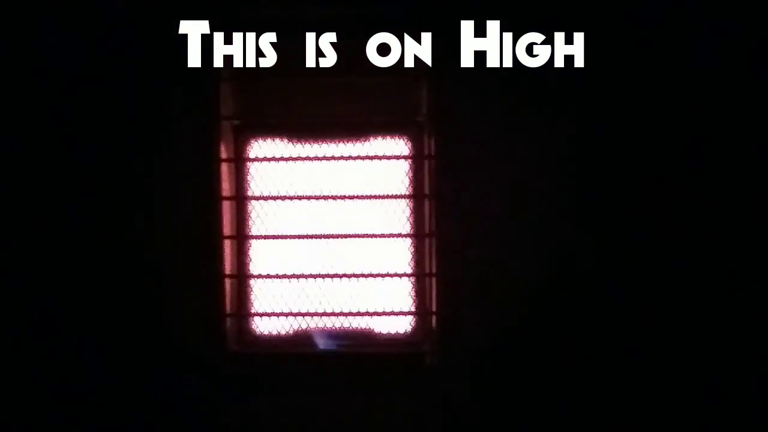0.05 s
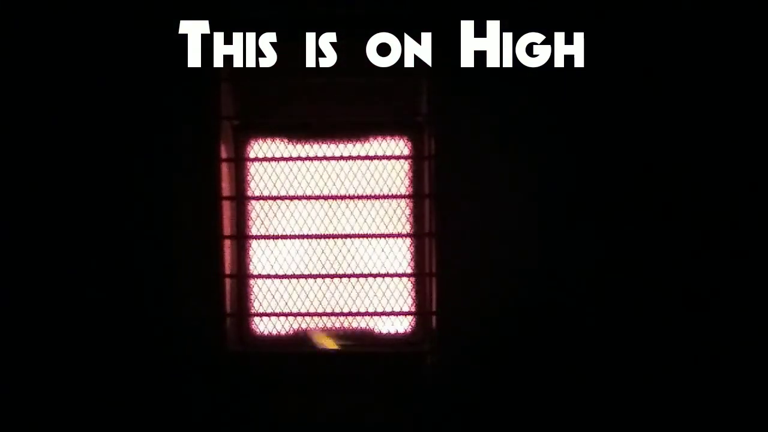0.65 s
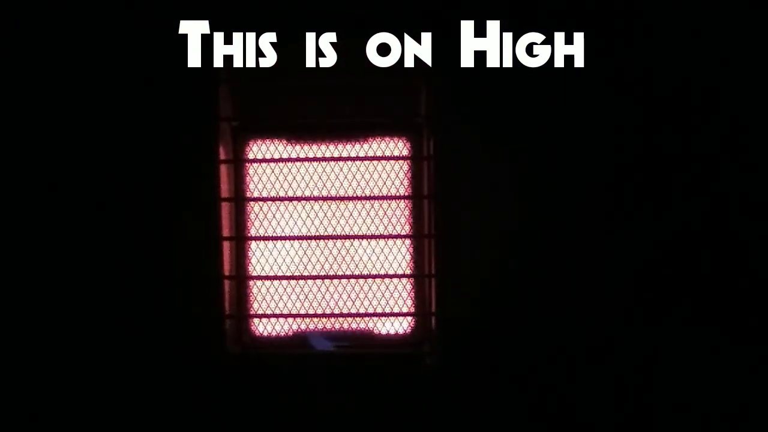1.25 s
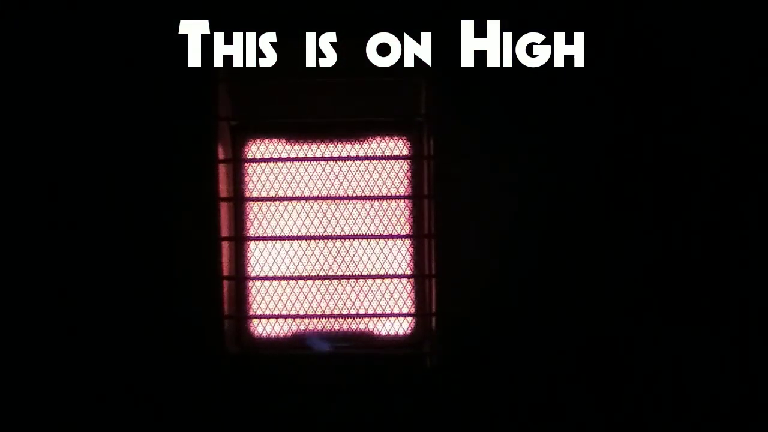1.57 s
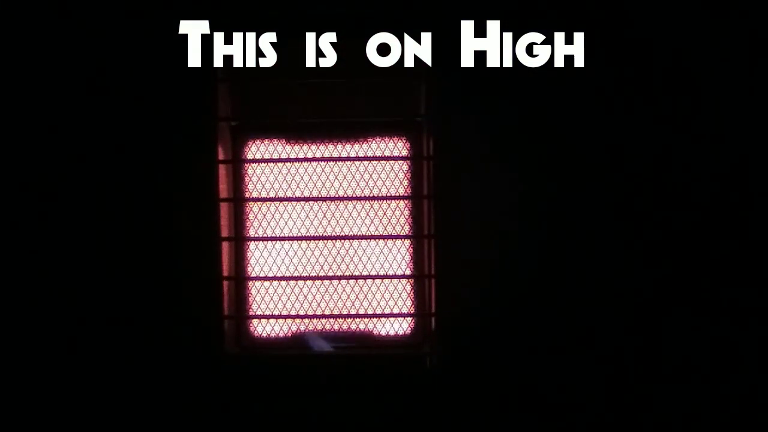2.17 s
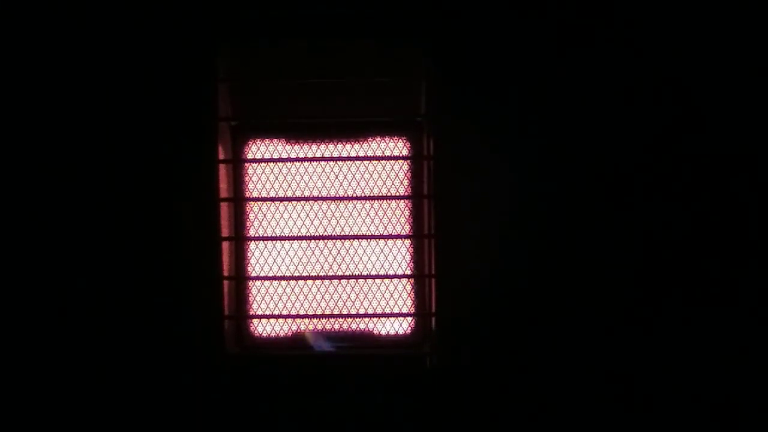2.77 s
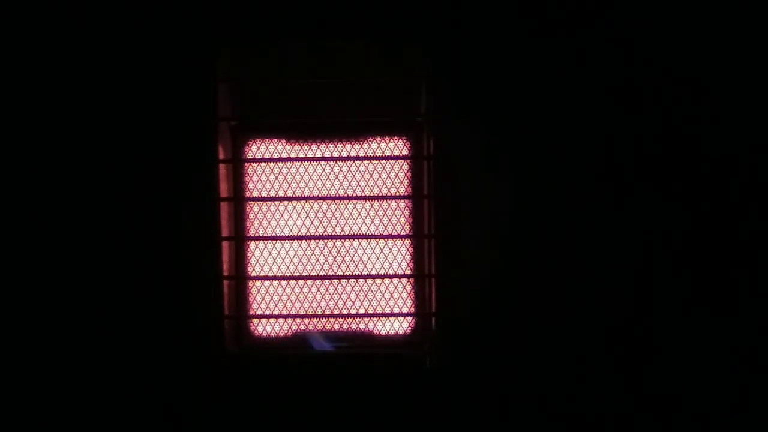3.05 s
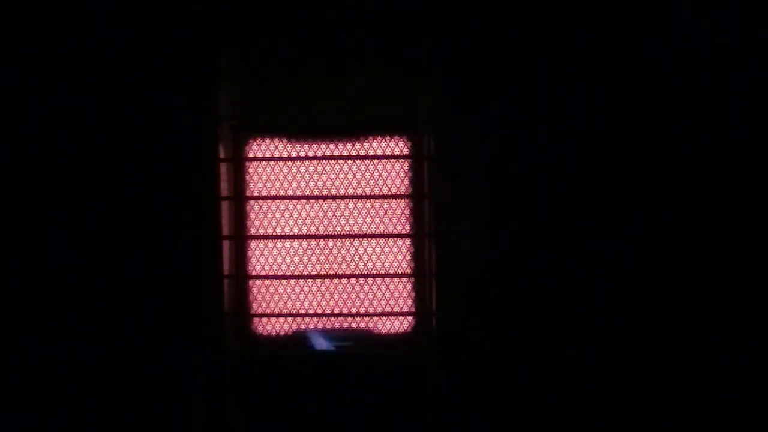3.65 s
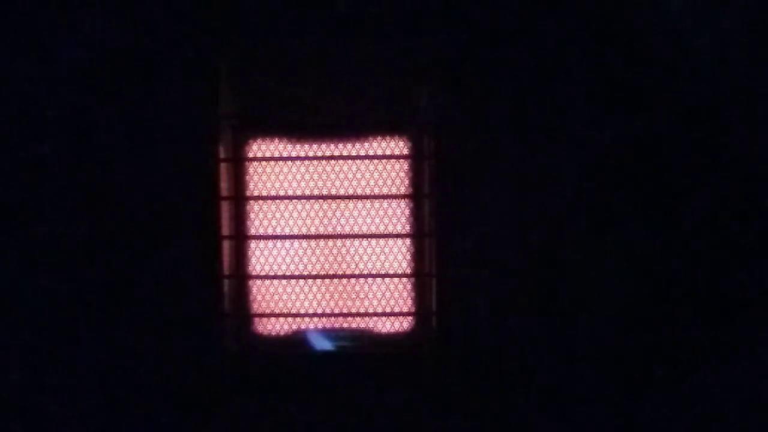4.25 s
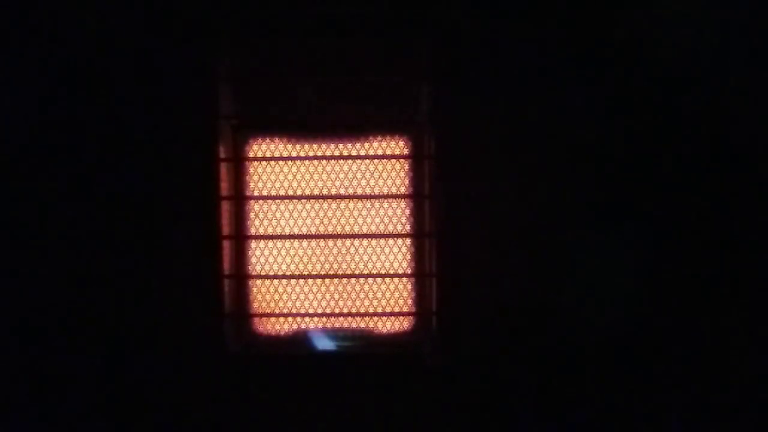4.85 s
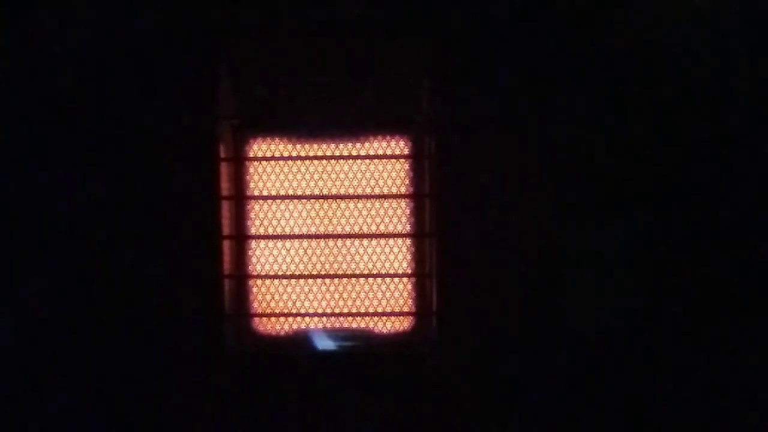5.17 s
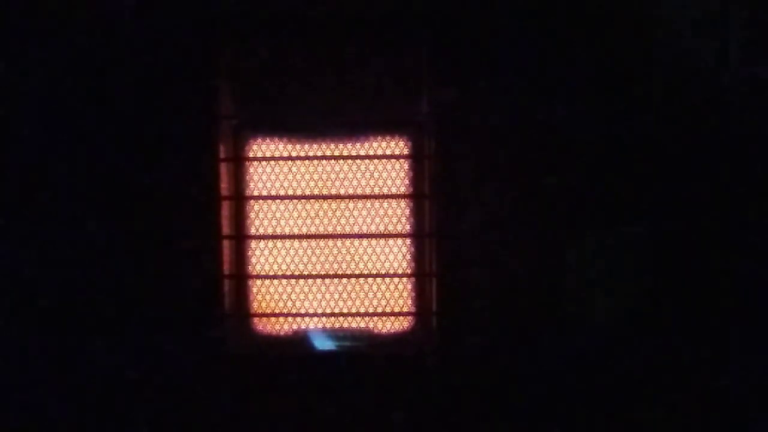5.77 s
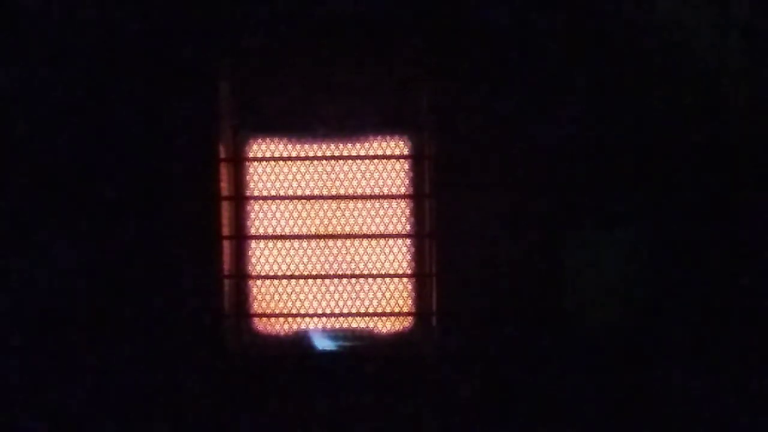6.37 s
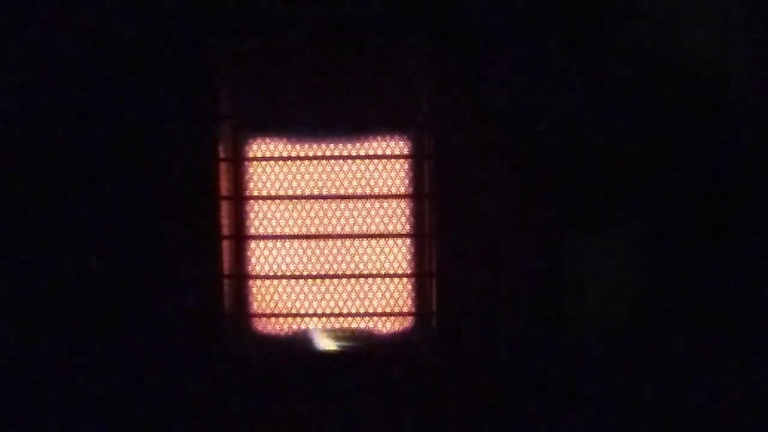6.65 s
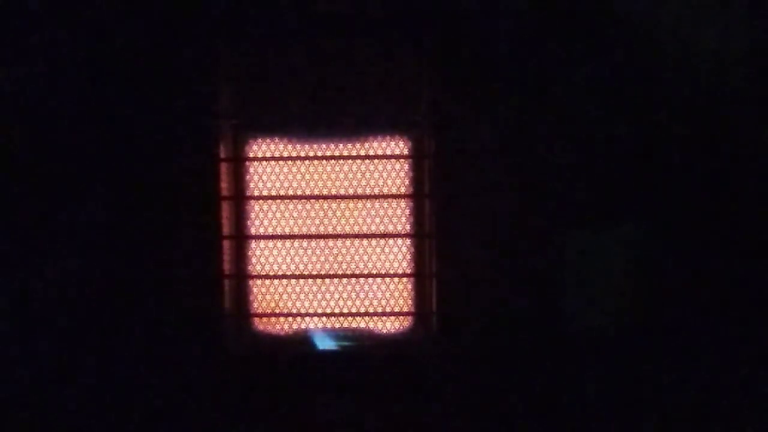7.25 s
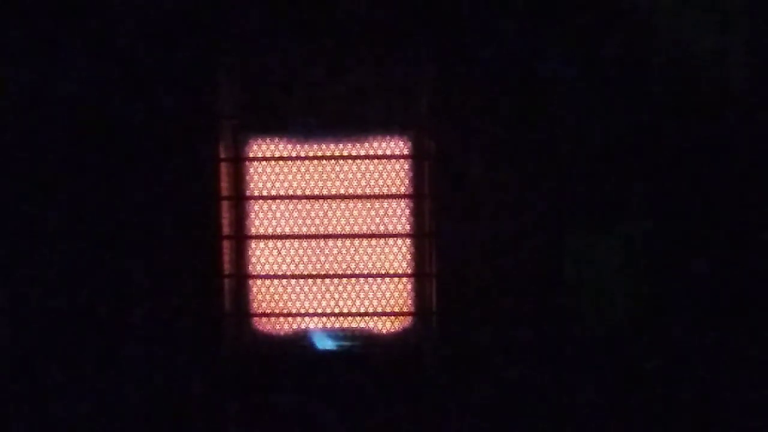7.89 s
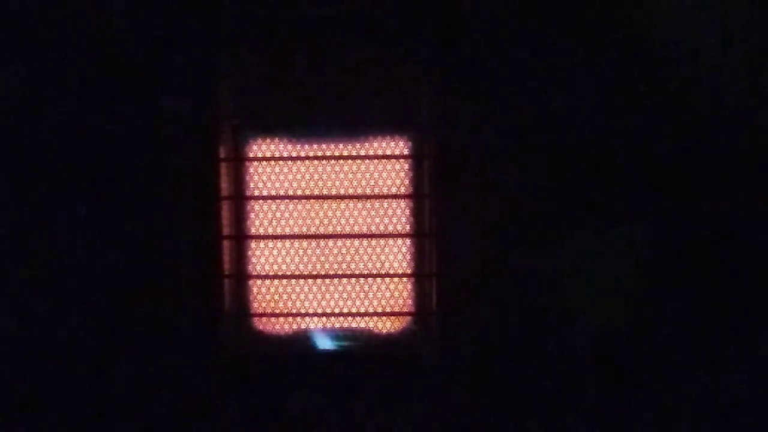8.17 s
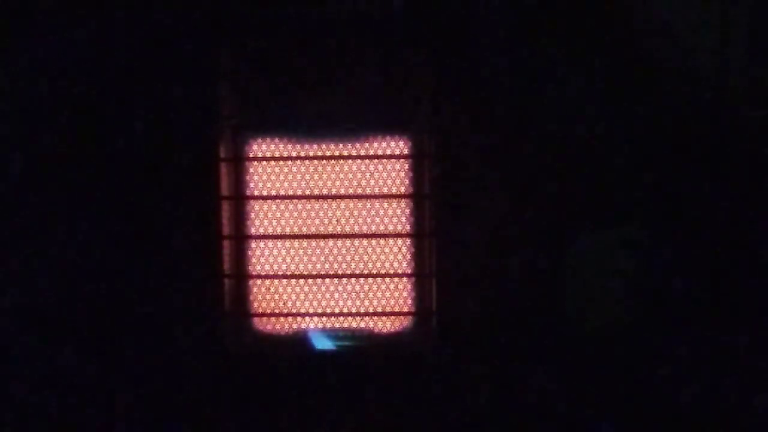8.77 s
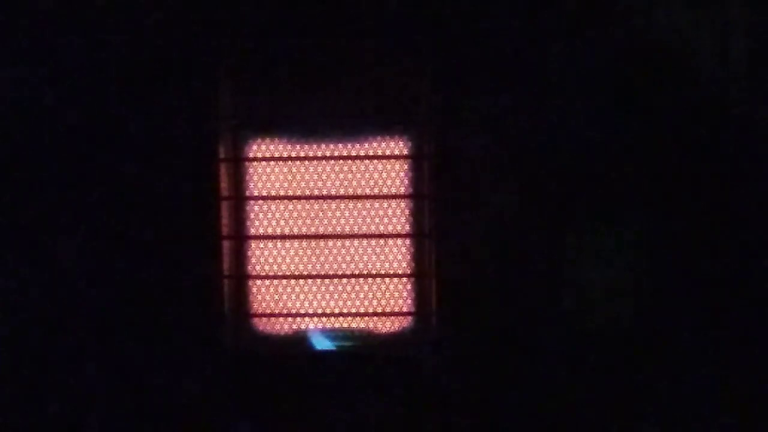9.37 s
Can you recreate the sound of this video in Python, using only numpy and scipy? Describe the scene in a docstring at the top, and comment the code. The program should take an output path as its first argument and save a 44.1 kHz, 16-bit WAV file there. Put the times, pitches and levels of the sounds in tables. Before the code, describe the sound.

A portable gas heater burns in a small quiet room with a faint, steady low murmur and a thin, high hiss. Its control knocks in the sheet-metal cabinet, each knock a dull thud with a hard click and short ring. A quick cluster comes around 1 second, a bright tick at 1.8, and light taps near 2.4, with soft handling noise. Between 3 and 3.5 seconds the hiss loses its bright edge, and a faint high whistle sputters until about 5. Firmer knocks land at 3.9 and 4.6, a sharp double click at 5.2, then lighter taps. The loudest knocks come at 6.7 and 8.2 seconds, with a run of tiny, nearly even ticks between them. Brief, soft, deep rumbles occur near 3.9, 8.2 and 9.2. The hiss swells slightly around 9 seconds, and one more sharp click follows at 9.3.

```python
"""A small quiet room, where a portable gas heater is turned down.
Its control knocks in the sheet-metal cabinet: a dull panel thud plus a hard metal click.
Bright metal ticks sound, and some knocks ping and snap. Underneath, the burner murmurs and the
gas hisses, losing its bright edge as the flow drops. Soft low flurries of handling noise stir
the panels, a thin whistle sputters and a deep rumble comes and goes."""
import sys
import numpy as np
from scipy import signal
from scipy.fft import rfft, irfft, next_fast_len
from scipy.io import wavfile
from scipy.ndimage import uniform_filter1d

SR = 44100
rng = np.random.default_rng(int(sys.argv[2]) if len(sys.argv) > 2 else 0)


def digitize_waveform(pressure):
    """Quantize a signal to 16-bit integers and store it at the path in sys.argv[1].

    Rows of a 2-D input are taken as channels; values are limited to [-1, 1].
    """
    field = np.atleast_2d(pressure).T
    bounded = np.clip(field, -1, 1)
    quanta = np.round(bounded * 32767).astype(np.int16)
    wavfile.write(sys.argv[1], SR, quanta)


N = 424241
TIME_S = np.arange(N) / SR
RING_S = TIME_S[:SR // 2]

# control knocks: start_s, slip_s, thud_db, thud_hz, click_db, extra_snap_db
KNOCKS = [(0.876, .0022, -45, 464, -47.5, -3), (0.887, 0.0014, -42.5, 375, -57, -7),
          (0.920, 0.0016, -61, 300, -52, -15), (1.024, 0.002, -45.5, 605, -52, -8),
          (1.169, .0012, -56.5, 380, -65, 8), (2.135, 0.003, -64.5, 520, -81, 0),
          (2.384, 0.002, -55.5, 232, -58.5, 0.5), (2.561, 0.0061, -55.5, 151, -82, 0),
          (3.250, .0023, -73, 450, -68, -6), (3.380, 0.0034, -67, 900, -70, -2),
          (3.632, 0.0013, -64, 1250, -68.5, 0), (3.857, 0.0016, -42.5, 268, -51, 0.5),
          (3.886, 0.0017, -52, 460, -54, -11), (4.120, 0.0018, -59.5, 690, -80, -6),
          (4.641, 0.0026, -36, 590, -46, -10), (5.017, 0.0021, -58, 380, -64.5, 7.5),
          (5.179, .0065, -53, 370, -44, -4), (5.193, 0.002, -45, 950, -36.5, -0.5),
          (5.364, 0.0049, -57.5, 810, -66, -5), (5.499, 0.00095, -49, 306, -63, 4.5),
          (5.761, 0.0016, -59.5, 515, -70, 0), (5.886, 0.0019, -44.5, 615, -54.5, 0.5),
          (6.116, 0.0013, -48, 960, -56.5, 0.5), (6.333, .003, -55.5, 280, -68, -2),
          (6.348, 0.0058, -53, 720, -65, -9), (6.706, 0.0024, -34, 380, -44.5, 6),
          (8.004, 0.0013, -67, 300, -62.5, -6), (8.180, 0.0025, -31, 368, -40.5, 7.5),
          (9.322, 0.0006, -53, 230, -47, -1.5)]
# thump, body, clack, crack, snap: low_hz, high_hz, base_t60_s, rise_per_slip, click_share_db
KNOCK_BANDS = [(134, 322, 0.2, 1.5, -43), (312, 690, 0.16, 0.8, -29), (793, 1200, 0.16, 3.8, -15.5),
               (1520, 4800, 0.14, 4.5, 0), (4900, 19500, 0.11, 1.5, 0)]
# knock spectrum: freq_hz, gain_db
KNOCK_SPECTRUM = [(100, 5), (200, 4.5), (290, 6), (450, 8), (650, 7), (850, -5.5), (1150, -6.5),
                  (1450, -9.5), (2000, -14), (2500, -14.5), (4800, -23), (6800, -16), (8500, -23.5),
                  (10500, -34), (15500, -40.5)]
# panel modes, then grille modes: pitch_hz, gain_db, base_t60_s
CABINET_MODES = [(189.4, -11, .4), (208, 0, 0.28), (272, -18, 0.45), (355, -10, 0.24), (436.2, 3, 0.16),
                 (455.3, -7, 0.4), (547.4, 4.5, 0.18), (669, -2, 0.28), (729, -5.5, 0.13),
                 (782, -3.5, 0.25), (908, -14, 0.15), (1142, -5.5, 0.25), (2370, -7, 0.16),
                 (2574, -7.5, 0.15), (2667, -5, 0.15), (3210, -6.5, 0.16), (4360, -5.5, 0.14),
                 (4840, -9, 0.098), (5660, -10, 0.099), (6110, -14, .15), (6640, -13, 0.12),
                 (6820, -13, 0.1), (7800, -10, 0.11)]
# bright metal ticks, and the pings and snaps of the knocks: start_s, relative_db, pitch_hz
TICKS = [(0.771, -61, 6640), (0.791, -54, 6770), (0.900, -55, 6200), (0.921, -57, 4000), (1.021, -54, 6500),
         (1.779, -43.5, 6070), (3.933, -55.5, 8800), (4.344, -58.5, 7900), (4.494, -62.5, 7900),
         (4.640, -41.5, 5580), (5.19, -45, 6600), (5.197, -41.5, 4490), (5.375, -62, 8000),
         (5.731, -63, 5840), (6.262, -65, 5800), (6.374, -65, 5800), (6.570, -61, 8000),
         (9.444, -64.5, 5800), (9.583, -63.5, 5800)]
# tick spectrum: freq_hz, gain_db
TICK_SPECTRUM = [(500, -21), (1800, -4), (3200, -3), (4600, -7.5), (5800, 4.5), (8000, 3), (10000, -8.5),
                 (15500, -21)]
# murmur of burner and room: freq_hz, gain_db
MURMUR_SPECTRUM = [(25, -27), (53, 0), (120, -3), (170, -5.5), (205, -3.5), (300, -10), (650, -14),
                   (1350, -17.5), (3000, -19.5), (4800, -22), (6000, -22.5), (8400, -24), (10300, -31),
                   (15500, -33.5)]
# gas jet, fading as the flow drops: time_s, level_db
JET_LEVELS = [(0, -75), (.6, -68), (2.8, -69), (3.2, -71.5), (3.5, -79.5), (9.6, -86)]
# jet resonances: pitch_hz, width_hz, gain_db
JET_MODES = [(6500, 220, -9), (6810, 150, -10), (7400, 270, -15), (8400, 2000, -3)]
# gas hiss spectrum: freq_hz, gain_db
HISS_SPECTRUM = [(300, -17), (1500, -5.5), (4000, -6.5), (5800, -3), (7000, 2.5), (8500, -3.5),
                 (10000, -13), (15500, -24)]
# hiss swells: centre_s, half_width_s, level_db
HISS_SWELLS = [(.08, 0.26, -61.5), (7.65, 1, -70.5), (9.03, 0.26, -62), (9.58, 0.22, -67)]
# handling noise spectrum: freq_hz, gain_db
HANDLING_SPECTRUM = [(30, -20), (70, -6), (200, 7), (550, -3.5), (900, -8), (2500, -22), (6000, -52)]
# flurries of handling noise: centre_s, half_width_s, relative_db
HANDLING_FLURRIES = [(.18, 0.19, -62.5), (.79, .13, -61), (2.32, .22, -64.5), (3.34, .1, -67),
                     (3.77, 0.099, -62), (7.6, 0.17, -64.5)]
# spells of sputtering: centre_s, half_width_s, level_db
WHISTLE_SPELLS = [(3.22, .13, -73), (3.87, .24, -68.5), (4.5, 0.43, -77), (8.9, 0.33, -70)]
# rumble spectrum: freq_hz, gain_db
RUMBLE_SPECTRUM = [(25, -33), (42, 0), (90, -4.5), (150, -2.5), (300, -40), (1000, -68)]
# rumble swells: centre_s, half_width_s, level_db
RUMBLE_SWELLS = [(3.9, 0.077, -58.5), (8.22, 0.077, -54.5), (8.95, 0.24, -65.5), (9.17, 0.1, -60)]
# room tail spectrum: freq_hz, gain_db
ROOM_SPECTRUM = [(60, -6), (160, 4.5), (550, -1), (1200, -5), (3000, -9), (9000, -31)]


def knock(slip_s, thud_db, thud_hz, click_db, snap_db, sharp_slip_s=0.0016, cabinet_db=-1):
    """A sharp blow, its scatter between close walls, and the ringing cabinet."""
    centres_hz, levels_db = knock_band_levels(thud_db, thud_hz, click_db, snap_db)
    t60_scale = 0.87 * 2 ** ((thud_db - click_db) / 60)  # more thud, longer ring
    sharpness = 0.27 * np.exp(1 - slip_s / sharp_slip_s)  # a slow slip has no sharp edge
    burst_gain = np.sqrt(0.017 / RING_S[-1])  # energy of 17 ms at the band's level
    impulse = colour(signal.unit_impulse(len(RING_S), 60), KNOCK_SPECTRUM)
    sound = np.zeros(len(RING_S))
    for level_db, (low_hz, high_hz, base_t60_s, rise_per_slip, _) in zip(levels_db, KNOCK_BANDS):
        band = signal.butter(3, [low_hz, high_hz], "band", fs=SR, output="sos")
        blow = signal.sosfilt(band, impulse)
        scatter = signal.sosfilt(band, noise(KNOCK_SPECTRUM, len(RING_S)))
        scatter *= rise_and_decay(base_t60_s * t60_scale, slip_s * rise_per_slip)
        sound += amp(level_db) * burst_gain * unit(sharpness * unit(blow) + unit(scatter))
    for pitch_hz, gain_db, base_t60_s in CABINET_MODES:
        drive_db = np.interp(np.log(pitch_hz), np.log(centres_hz), levels_db)
        mode = np.sin(2 * np.pi * (pitch_hz * RING_S + rng.random()))
        envelope = rise_and_decay(base_t60_s * t60_scale, slip_s)
        sound += amp(drive_db + gain_db + cabinet_db) * envelope * mode
    fade_out = np.minimum(1, (RING_S[-1] - RING_S) * 10)
    return sound * fade_out


def knock_band_levels(thud_db, thud_hz, click_db, snap_db, fall_db_per_octave_sq=5.5):
    """Band centres and levels: a thud around its pitch plus a click in the treble."""
    low_hz, high_hz, _, _, click_share_db = np.transpose(KNOCK_BANDS)
    centres_hz = np.sqrt(low_hz * high_hz)
    is_snap_band = centres_hz == centres_hz.max()
    thud = amp(thud_db - fall_db_per_octave_sq * np.log2(centres_hz / thud_hz) ** 2)
    click = amp(click_db + click_share_db + snap_db * is_snap_band)
    return centres_hz, 20 * np.log10(np.hypot(thud, click))


def tick(relative_db, pitch_hz, full_ring_db=-40, trim_db=-0.5):
    """A metal tick or a knock's ping: a bright snap with one short ring, clearer when louder."""
    snap = unit(noise(TICK_SPECTRUM, len(RING_S)) * rise_and_decay(t60_s=0.088, rise_s=0.0013))
    ring = amp(0.5 * (relative_db - full_ring_db)) * unit(resonate(snap, pitch_hz, width_hz=220))
    return amp(relative_db + trim_db) * unit(snap + ring, count=1100)


def creep_ticks(first_s=7.14, step_s=0.139, count=8, jitter_s=0.004, relative_db=-65, pitch_hz=5800):
    """Metal creeps in near-even steps, one faint tick each; rows as in TICKS."""
    starts_s = first_s + step_s * np.arange(count) + jitter_s * rng.standard_normal(count)
    return [(start_s, relative_db, pitch_hz) for start_s in starts_s]


def burner(murmur_db=-62.5, pipe_hz=5500, pipe_db=-80):
    """Steady murmur and a faint pipe resonance."""
    pipe = unit(resonate(rng.standard_normal(N), pipe_hz, width_hz=130))
    return amp(murmur_db) * noise(MURMUR_SPECTRUM) + amp(pipe_db) * pipe


def gas():
    """Turbulence sings in the jet and hisses broadly."""
    turbulence = noise(HISS_SPECTRUM)
    jet = unit(sum(amp(db) * resonate(turbulence, hz, width_hz) for hz, width_hz, db in JET_MODES))
    jet_db = np.interp(TIME_S, *np.transpose(JET_LEVELS))
    hiss = swells(HISS_SWELLS, steady_db=-80.5) * noise(HISS_SPECTRUM)
    return amp(jet_db) * jet + hiss


def handling_noise(flutter_rms_db=2.0, trim_db=-4.5):
    """Soft low flurries of handling noise that stir the panels, over a faint steady flutter."""
    flutter = amp(flutter_rms_db * unit(uniform_filter1d(rng.standard_normal(N), size=2000)))
    drive = noise(HANDLING_SPECTRUM) * flutter
    panels = unit(sum(amp(db) * resonate(drive, hz, 5 / t60_s) for hz, db, t60_s in CABINET_MODES))
    return amp(trim_db) * swells(HANDLING_FLURRIES, steady_db=-78) * (drive + 0.96 * panels)


def whistle(pitch_hz=8350, width_hz=800, pip_db=-69):
    """A thin whistle of narrow-band noise: sputters in spells, pips faintly throughout."""
    band = resonate(rng.standard_normal(N), pitch_hz, width_hz)
    tone = unit(resonate(band, pitch_hz, width_hz))
    sputter = swells(WHISTLE_SPELLS, steady_db=-89) * unit(0.76 + pulses(period_s=0.02))
    pips = amp(pip_db) * pulses(period_s=0.08)
    return tone * np.hypot(sputter, pips)


def rumble():
    """Deep noise with brief swells."""
    return swells(RUMBLE_SWELLS, steady_db=-82.5) * noise(RUMBLE_SPECTRUM)


def room_tail(hits, t60_s=0.55, rise_s=0.013, gain_db=-16.5):
    """Faint, dull room reflections of the knocks and ticks."""
    tail = rng.standard_normal(len(RING_S)) * rise_and_decay(t60_s, rise_s)
    tail = colour(tail / np.linalg.norm(tail), ROOM_SPECTRUM)
    tail *= RING_S < 0.9 * RING_S[-1]
    return amp(gain_db) * signal.oaconvolve(hits, tail)[:N]


def swells(rows, steady_db):
    """Steady gain with bell-shaped swells, summed in power."""
    bells = [amp(db) * np.exp(-((TIME_S - centre_s) / half_s) ** 2) for centre_s, half_s, db in rows]
    return np.sqrt(amp(steady_db) ** 2 + sum(bell ** 2 for bell in bells))


def pulses(period_s, align_s=0.059, half_width_s=0.0024):
    """Gain of short, evenly spaced pulses."""
    offset_s = (TIME_S - align_s + period_s / 2) % period_s - period_s / 2
    return np.exp(-(offset_s / half_width_s) ** 2)


def rise_and_decay(t60_s, rise_s):
    """Envelope: quick build-up, exponential decay."""
    return (1 - np.exp(-RING_S / rise_s)) * amp(-60 * RING_S / t60_s)


def resonate(x, pitch_hz, width_hz):
    """One resonance."""
    return signal.lfilter(*signal.iirpeak(pitch_hz, pitch_hz / width_hz, SR), x)


def noise(spectrum, size=N):
    """Coloured noise, rms 1."""
    return unit(colour(rng.standard_normal(next_fast_len(size)), spectrum)[:size])


def colour(x, spectrum):
    """Filters by rows of freq_hz, gain_db."""
    freq_hz, gain_db = np.transpose(spectrum)
    bins_hz = np.fft.rfftfreq(len(x), 1 / SR)
    gain = amp(np.interp(np.log(bins_hz + 1), np.log(freq_hz), gain_db))
    return irfft(rfft(x) * gain, len(x))


def amp(db):
    """Decibels to gain."""
    return 10 ** (np.asarray(db) / 20)


def unit(x, count=None):
    """Scales to rms 1 over the first count samples."""
    return x / np.sqrt(np.mean(x[:count] ** 2) + 1e-24)


def add(mix, start_s, sound):
    """Mixes a sound in at start_s."""
    part = mix[round(start_s * SR):][:len(sound)]
    part += sound[:len(part)]


def scene():
    """Knocks and ticks over the burning heater, mono."""
    background = burner() + handling_noise() + gas() + whistle() + rumble()
    hits = np.zeros(N)
    for start_s, *blow in KNOCKS:
        add(hits, start_s, knock(*blow))
    for start_s, relative_db, pitch_hz in TICKS + creep_ticks():
        add(hits, start_s, tick(relative_db, pitch_hz))
    return (background + hits + room_tail(hits))[None]


def record(dry):
    """Steep low-pass at 15.9 kHz."""
    low_pass = signal.firwin(511, 15900, window=("kaiser", 9), fs=SR)
    return signal.oaconvolve(dry, low_pass[None], "same")


dry = scene()
out = record(dry)
digitize_waveform(out)
```